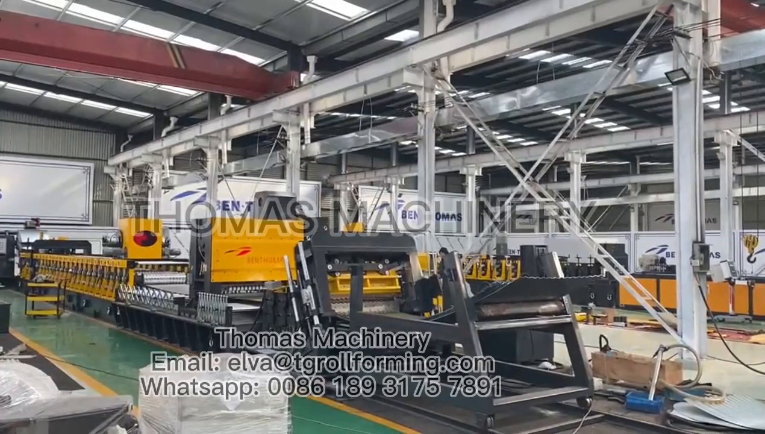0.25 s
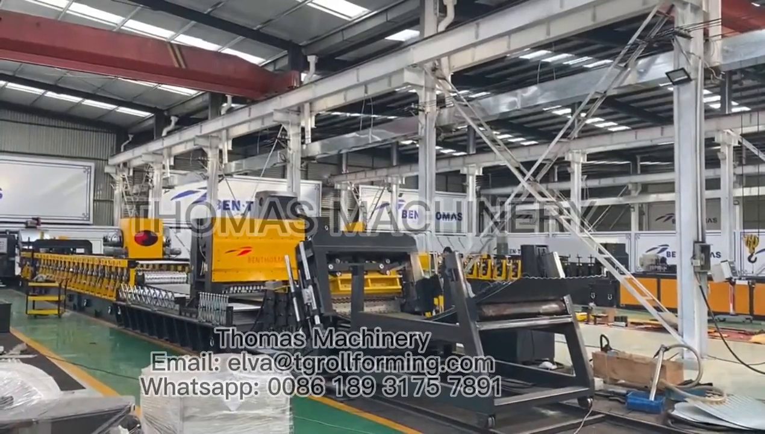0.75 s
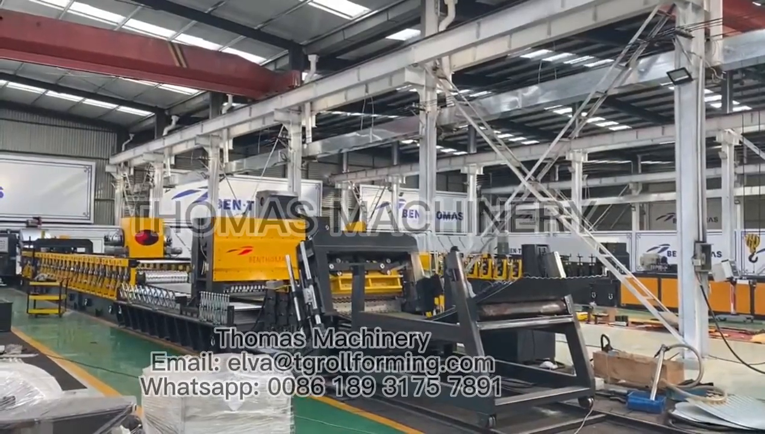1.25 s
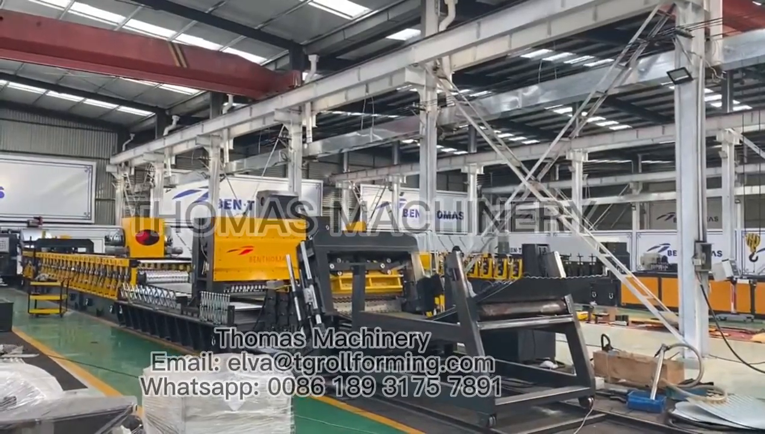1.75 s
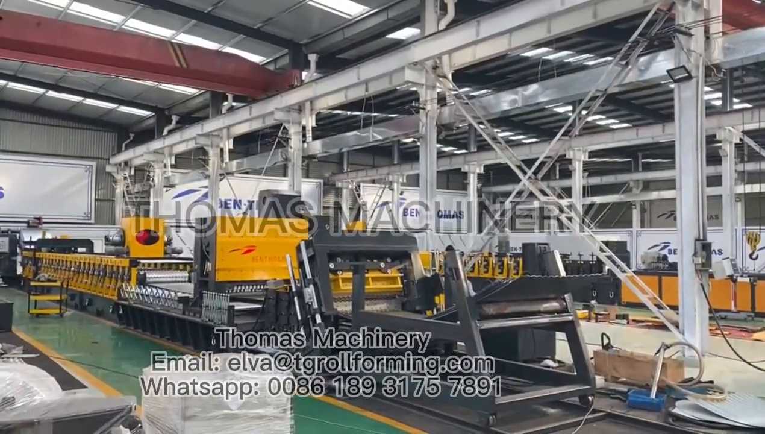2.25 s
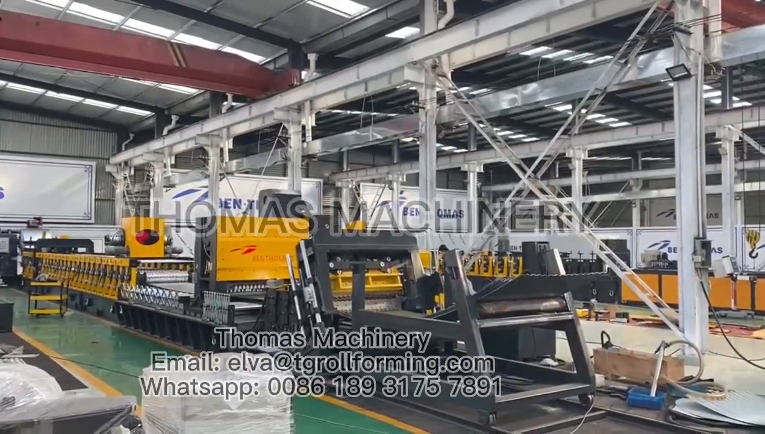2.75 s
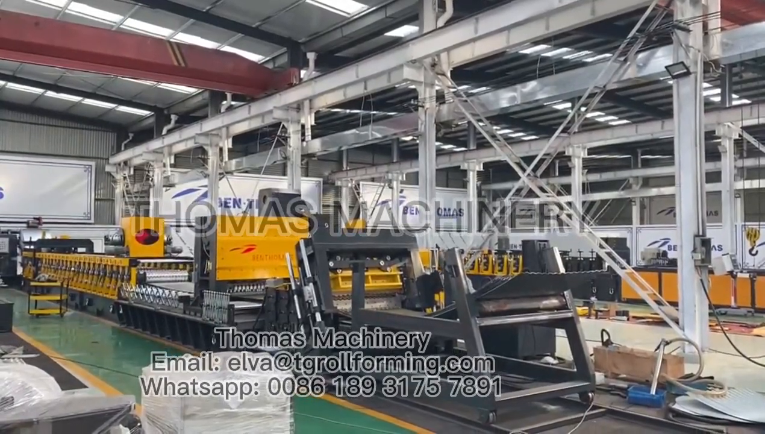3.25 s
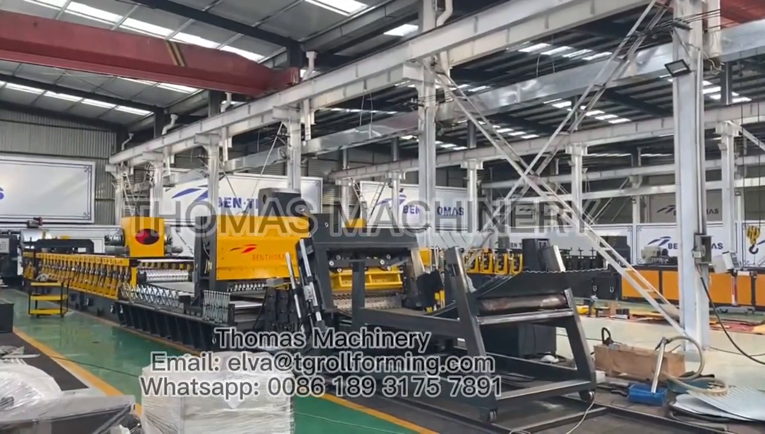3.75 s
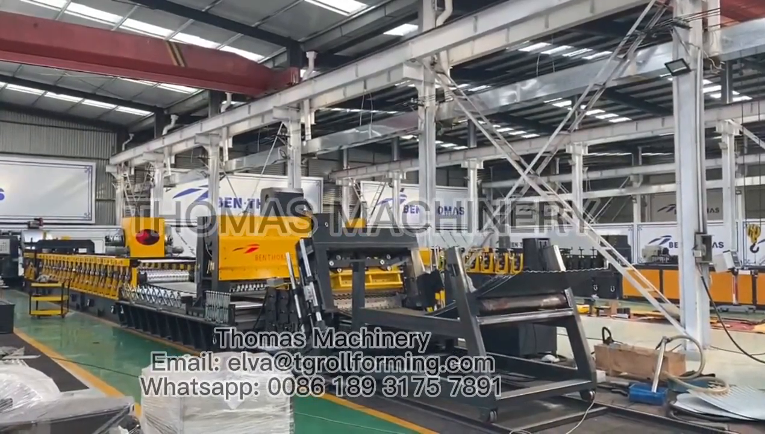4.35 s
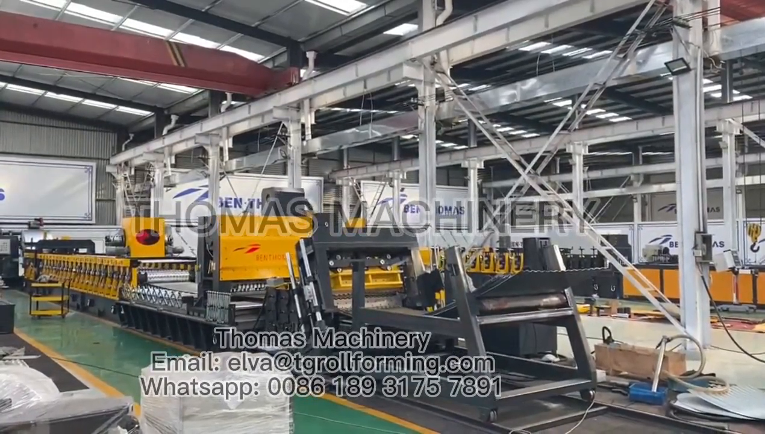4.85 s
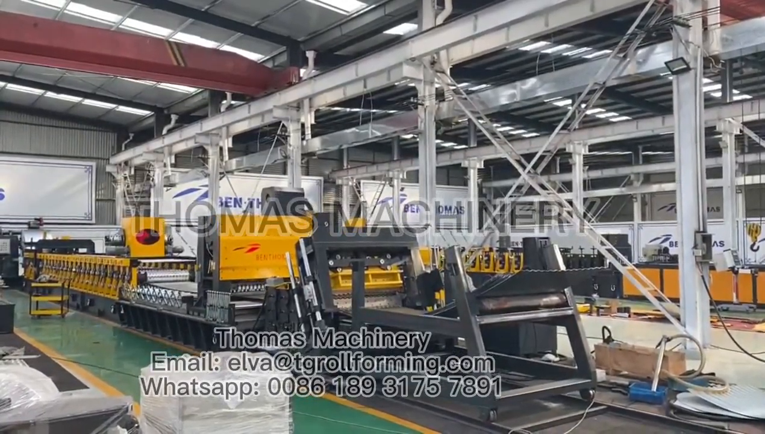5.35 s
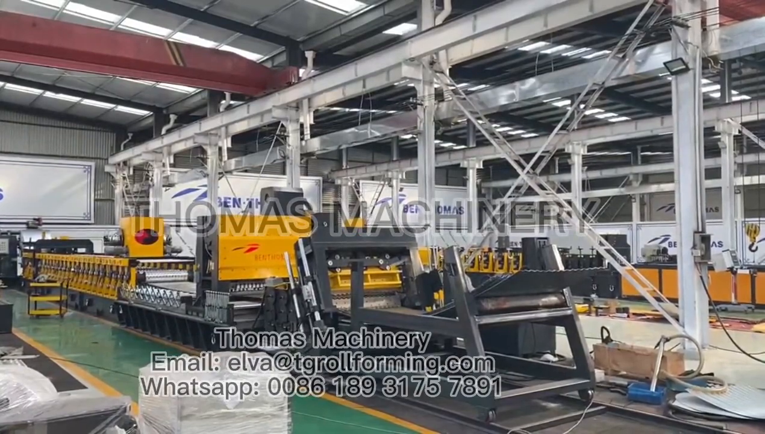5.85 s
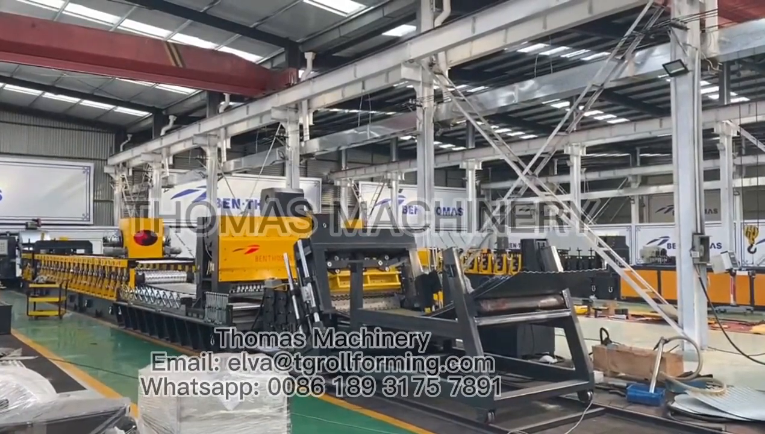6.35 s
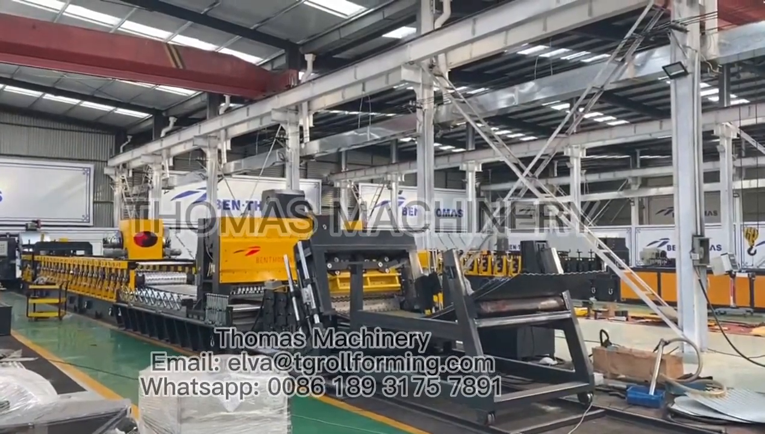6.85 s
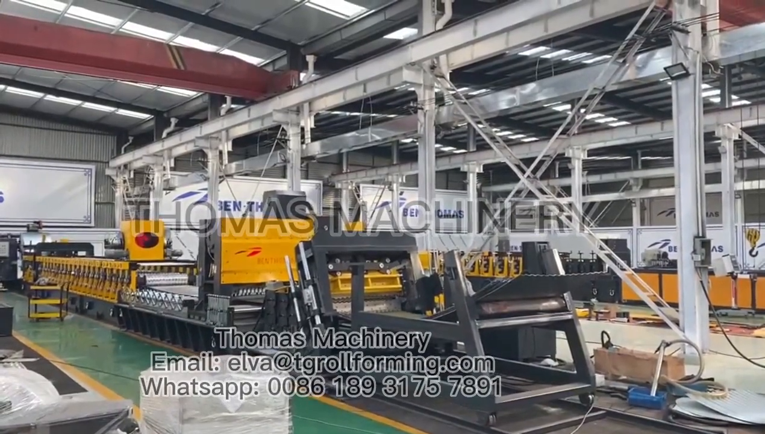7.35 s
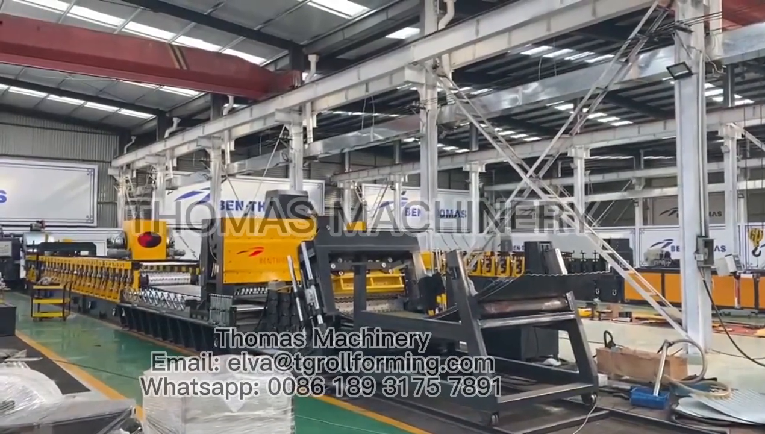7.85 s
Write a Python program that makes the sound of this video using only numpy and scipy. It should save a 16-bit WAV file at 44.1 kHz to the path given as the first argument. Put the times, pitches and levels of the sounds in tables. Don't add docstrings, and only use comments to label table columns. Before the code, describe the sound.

A sheet-metal machine works in a big reverberant hall. Over steady motor roar and low hum, a dull clamp knock comes first, then a sharp bright shear bang, then a landing clank and a swelling rush of booming, clattering sheet that fades within a second. This repeats about every two seconds, four times, with slight differences. It is heard in stereo from the side on a phone, with little deep bass.

```python
import sys
import numpy as np
from scipy import signal
from scipy.fft import rfft, irfft, next_fast_len
from scipy.io import wavfile
from scipy.ndimage import uniform_filter1d, map_coordinates

SR = 44100
rng = np.random.default_rng(int(sys.argv[2]) if len(sys.argv) > 2 else 0)


def invert_db(x):
    u = np.asarray(x, float) / 20
    return 10 ** u


def to_wav(s):
    ch = np.atleast_2d(s).T
    pcm = np.round(np.clip(ch, -1, 1) * 32767)
    wavfile.write(sys.argv[1], SR, pcm.astype(np.int16))


N = 356352


def unit(x):
    return x / np.sqrt(np.mean(x ** 2) + 1e-20)


def along(points, hz):
    f, v = np.transpose(points)
    return np.interp(np.log(hz + 1), np.log(f + 1), v)


def wobble(rate):
    knots = rng.standard_normal(int(N * rate / SR) + 4)
    return map_coordinates(knots, [np.arange(N) * rate / SR])


def filtered(x, response):
    m = next_fast_len(x.shape[-1] + SR // 2)
    hz = np.fft.rfftfreq(m, 1 / SR)
    return irfft(rfft(x, m) * response(hz), m)[..., :x.shape[-1]]


def modes(table):
    def response(hz):
        total = 0
        for k, (center, width, db) in enumerate(table):
            damping = 1j * hz * width
            total = total + (-1) ** k * invert_db(db) * damping / (center ** 2 - hz ** 2 + damping)
        return total
    return response


def patchy(patchy_db, narrow, long):
    z = signal.stft(rng.standard_normal((2, N)), nperseg=1024)[2]
    field = uniform_filter1d(rng.standard_normal(z.shape[1:]), narrow, axis=0)
    field = uniform_filter1d(field, long, axis=1)
    return signal.istft(z * invert_db(patchy_db * unit(field)), nperseg=1024)[1][:, :N]


def coloured(pair, spectrum, peaks=()):
    def response(hz):
        return invert_db(along(spectrum, hz)) * np.sqrt(1 + np.abs(modes(peaks)(hz)) ** 2)
    return unit(filtered(pair, response))


def add_at(track, s, sound):
    start = round(s * SR)
    track[:, start:start + sound.shape[-1]] += sound


# (frequency [Hz], level per Hz [dB])
HALL_TONE = [(20, -66), (48, -3), (90, -6), (180, -8.5), (300, -9), (420, -10), (500, -12.5), (1100, -13.5),
             (2000, -26.5), (3000, -34.5), (5000, -30.5), (7000, -43.5), (11000, -49), (12800, -66),
             (15500, -101)]
# (frequency [Hz], width [Hz], level [dB])
GEARS = [(1730, 33, 7), (2910, 170, 13), (4210, 100, 9.5), (5140, 650, 4.5)]
# (multiple of the shaft speed [-], level [dB])
MOTOR = [(2, -14), (4, -6), (5, -12), (6, -10), (7, 2.5), (8, -2), (9, -12), (10, -13), (12, -5), (14, -12),
         (15, -3.5), (16, -8), (17, -12), (18, -11), (19, -17), (21, -10)]
# (time [s], level [dB])
PUMP = [(0.0, -42), (0.9, -38.5), (1.19, -58), (1.53, -36), (2.3, -52), (3.58, -39), (4.57, -51),
        (5.83, -37), (6.17, -54), (6.77, -43.5), (7.76, -41), (8.08, -45)]
# (frequency [Hz], level [dB])
WHINE_TONES = [(827, 3), (262.3, -7), (903, -2), (925, -5)]


def machines():
    shaft_hz = 24.94
    turns = np.cumsum(shaft_hz * (1 + 0.0013 * wobble(2.267))) / SR
    throb = 1 + 0.04 * np.sin(4 * np.pi * turns) + 0.089 * np.sin(8 * np.pi * turns)
    roar = invert_db(-31.5) * throb * coloured(patchy(2.4, narrow=2, long=12), HALL_TONE, GEARS)

    angle = np.linspace(0, 1, 1025)
    patterns = np.zeros((3, len(angle)))
    for multiple, db in MOTOR:
        patterns += invert_db(db) * np.sin(2 * np.pi * (multiple * angle + rng.random((3, 1))))
    hum = np.zeros(N)
    for db, pattern in zip((-30.5, -45, -45), patterns):
        hum += invert_db(db + 0.8 * wobble(2.5)) * np.interp(turns % 1, angle, unit(pattern))

    seconds = np.arange(N) / SR
    uneven_time = seconds + 0.0013 * np.cumsum(wobble(13)) / SR
    whine = np.zeros(N)
    for hz, db in WHINE_TONES:
        whine += invert_db(db + 1.6 * wobble(14)) * np.sin(2 * np.pi * hz * uneven_time)
    pump_db = np.interp(seconds, *np.transpose(PUMP))
    return roar + (hum + invert_db(pump_db) * whine) * np.array([[1], [0.6]])


# (frequency [Hz], time to fall 60 dB [s])
ECHO = [(100, 2.6), (1000, 6.6), (4000, 0.74), (12000, 0.48)]


def echo(pair):
    hz, t, z = signal.stft(rng.standard_normal((2, 3 * SR // 2)), SR, nperseg=256)
    fade = invert_db(-60 * t / along(ECHO, hz)[:, None])
    tail = signal.istft(z * fade, SR, nperseg=256)[1]
    late = np.pad(pair, ((0, 0), (1300, 0)))
    return signal.fftconvolve(late, tail / np.linalg.norm(tail[0]), axes=1)[:, :N]


# (time [s], peak level [dB], frequency [Hz], time to fall 60 dB [s])
KNOCKS = [(.725, -22.5, 397, 0.21), (.885, -26, 900, .2), (.975, -21.5, 2400, 0.16), (.985, -26, 3150, .1),
          (.98, -26, 1950, .25), (2.864, -25, 390, 0.34), (3.042, -18, 900, 0.12), (3.044, -24, 1500, .1),
          (3.12, -22, 2300, .2), (3.11, -22, 6600, .07), (3.05, -26, 2000, .2), (5.02, -25, 1120, 0.16),
          (5.165, -28, 906, 0.33), (5.27, -21.5, 2110, 0.28), (5.285, -26, 4070, .2),
          (5.555, -17, 916, 0.2), (5.56, -22, 1900, .25), (6.954, -26.5, 404, 0.18),
          (6.965, -27, 1100, 0.15), (7.12, -23, 493, 0.2), (7.122, -27, 900, .15), (7.17, -24, 520, .15),
          (7.04, -26, 280, .12), (7.125, -33, 1200, .2), (7.35, -29, 2200, .15), (7.515, -24, 2050, .2),
          (7.51, -27, 3100, .15)]


def knocks():
    t = np.arange(SR // 3) / SR
    track = np.zeros((2, N + SR))
    for s, db, hz, t60 in KNOCKS:
        pitch = hz * (1 + 0.07 * rng.standard_normal((5, 1, 1)))
        phase = rng.random((5, 2, 1))
        ring = np.sin(2 * np.pi * (pitch * t + phase)).sum(axis=0)
        add_at(track, s, (1 - np.exp(-t / 0.0041)) * invert_db(db - 3 - 60 * t / t60) * ring)
    return track[:, :N]


# (time [s], peak level [dB])
TICKS = [(0.7267, -33), (0.925, -32), (0.944, -24), (.98, -21), (1.04, -26), (1.256, -21), (2.6194, -48),
         (2.8569, -37), (3.06, -36), (3.085, -25), (3.3912, -26), (5.0115, -35), (5.196, -36), (5.23, -22),
         (5.534, -26), (5.544, -18), (5.8685, -45), (6.9454, -34), (7.165, -34), (7.187, -17), (7.208, -14),
         (7.4984, -22), (7.5794, -29), (7.75, -36), (7.9, -35), (3.44, -27), (3.6, -32)]
# (frequency [Hz], level per Hz [dB])
EDGE = [(4000, -40), (7000, -9), (11000, 1), (15500, -1), (15800, -60)]


def ticks():
    t = np.arange(SR // 3) / SR
    track = np.zeros((2, N + SR))
    for s, db in TICKS:
        shape = (1 - np.exp(-t / 0.004)) ** 2 * invert_db(db + 3.5 - 60 * t / 0.14)
        add_at(track, s, shape * rng.standard_normal((2, len(t))))
    return filtered(track, lambda hz: invert_db(along(EDGE, hz)))[:, :N]


# (time [s], peak level [dB], thud level [dB], clang level [dB], thud frequency [Hz])
BLOWS = [(0.72, -27, 8, -11, 88.8), (0.889, -25, 5, -14, 141), (0.942, -4, -14, -11, 122.7),
         (1.256, -15, -3, -3, 76.8), (2.619, -31, -0.5, -6, 182), (2.8594, -29, 5, -1, 100),
         (3.0437, -21, 8, 0, 124), (3.085, -5, -15, -17, 96), (3.1121, -9, -8, -6, 138.3),
         (3.3998, -16, 0, 4, 77.5), (4.436, -39, 18, 12, 181), (5.0206, -29, -5, -7, 292),
         (5.1685, -26, 8, -7, 300), (5.231, -6, -9, -5, 213), (5.544, -14, -4, 0.5, 88.3),
         (5.8684, -30.5, 8, 13, 138.2), (6.944, -28, 4, -9, 118), (7.1223, -26, -6, -7, 185),
         (7.184, -10, -8, -22, 121), (7.208, -12, -4, -16, 140.6), (7.4983, -15.5, -3, 1, 136),
         (7.5794, -34, -10, 3, 280)]
# (frequency [Hz], level per Hz [dB])
SNAP = [(1200, -20), (1800, -1.5), (2400, -15), (3200, -29), (4500, -3.5), (6200, -0.5), (8000, -2),
        (10000, -1.5), (12000, -10), (15400, -12), (15800, -60)]
# (frequency [Hz], width [Hz], level [dB])
BLADE = [(2300, 580, 11.5), (4020, 150, 12), (4470, 230, -1), (6100, 300, -4), (6900, 630, -1.5),
         (8500, 220, 5.5), (9650, 60, 6.5), (10000, 52, -1)]
# (frequency [Hz], width [Hz], level [dB])
PANEL = [(510, 88, 1), (858, 23, 11), (1269, 25, 10), (1900, 310, -5), (2380, 110, 4)]


def blows():
    t = np.arange(SR // 3) / SR
    shape = (1 - np.exp(-t / 0.0042)) ** 2 * invert_db(-60 * t / 0.37)
    on_blade, on_panel, thuds = np.zeros((3, 2, N + SR))
    for s, db, thud_db, clang_db, hz in BLOWS:
        thud = np.sin(2 * np.pi * hz * t) * (1 - np.exp(-t / 0.022))
        add_at(on_blade, s, invert_db(db - 8.5) * shape * rng.standard_normal((2, len(t))))
        add_at(on_panel, s, invert_db(db + clang_db + 1.5) * shape * rng.standard_normal((2, len(t))))
        add_at(thuds, s, invert_db(db + thud_db - 3.5) * shape * thud)
    snap = filtered(on_blade, lambda hz: invert_db(along(SNAP, hz)) * (1 + np.abs(modes(BLADE)(hz))))
    clang = filtered(on_panel, modes(PANEL))
    return (snap + clang + thuds)[:, :N]


# (time of the crest [s], peak level [dB], frequency [Hz], length [s])
FLEXES = [(.97, -15, 118, .07), (1.03, -21, 255, .07), (1.27, -18, 80, .06), (1.31, -18, 107, .05),
          (1.37, -13, 263, .08), (1.4, -19, 199, .05), (1.44, -19, 339, .05), (1.444, -22, 1248, .03),
          (1.489, -20, 1475, .03), (1.52, -18, 177, .08), (1.52, -19, 279, .05), (1.63, -19, 177, .07),
          (3.11, -19, 75, .07), (3.13, -15, 134, .06), (3.35, -20, 140, .05), (3.44, -16, 204, .06),
          (3.5, -16, 253, .06), (3.534, -20, 1184, .03), (3.62, -17, 306, .06), (3.707, -20, 1270, .03),
          (5.22, -21, 100, .06), (5.276, -23, 1830, .04), (5.55, -18, 80, .05), (5.577, -20, 1819, .03),
          (5.6, -17, 215, .06), (5.61, -21, 530, .06), (5.71, -20, 300, .05), (5.85, -20, 255, .05),
          (6.07, -18, 215, .06), (7.215, -12, 120, .04), (7.24, -15, 95, .035), (7.225, -19, 240, .04),
          (7.235, -21, 370, .05), (7.29, -12.5, 134, .05), (7.29, -20, 250, .04), (7.36, -19, 230, .04),
          (7.4, -21, 110, .08), (7.45, -20, 145, .05), (7.5, -20, 120, .05), (7.533, -23, 2487, .04),
          (7.54, -22, 1313, .03), (7.543, -16, 807, .03), (7.135, -22, 480, .03), (7.185, -20, 520, .04),
          (7.2, -22, 180, .04), (3.047, -19, 900, .012), (7.56, -18, 253, .05), (7.71, -20, 250, .05),
          (7.77, -20, 180, .05), (7.807, -22, 1313, .03), (7.85, -20, 300, .05)]


def flexes():
    t = np.arange(-SR // 4, SR // 4) / SR
    track = np.zeros((2, N + SR))
    for s, db, hz, length_s in FLEXES:
        slower = np.where(t > 0, 1.25, 1)
        swell = np.exp(-(t / (0.45 * length_s * slower)) ** 2)
        add_at(track[:1], s - 0.25, invert_db(db) * swell * np.sin(2 * np.pi * hz * t))
    return track[:, :N]


def shaken(events, kind, rise_s, t):
    level_db, share, sag, fall = np.transpose(kind)[:, :, None]
    power = np.zeros((len(kind), len(t)))
    for s, db, weight_db, hold_s in events:
        age = t - s - rise_s
        still_to_rise_db = 12 * np.maximum(-age, 0) / rise_s
        sagged_db = sag * np.clip(age, 0, hold_s)
        fallen_db = fall * np.maximum(age - hold_s, 0)
        lost_db = still_to_rise_db + sagged_db + fallen_db
        power += (t > s) * invert_db(db + level_db + share * weight_db - lost_db) ** 2
    return power


# (time [s], load [dB])
FEED = [(0, 2), (.5, -4), (.85, 4), (2.4, 0), (2.7, 3), (3.0, 3), (4.2, 0), (4.55, -1), (4.7, 5.5),
        (5.1, 2), (6.5, -2), (6.75, -7), (7.1, 2), (8.08, 3.5)]
# (level [dB], change per dB of load [dB])
ROLLING = [
    (-36.5, .3),
    (-34, 0.5),
    (-44, 2.3),
    (-45.5, 0.9),
]
# (time [s], strength [dB], weight [dB], hold [s]); the first table
# holds the clamps plus stacker bumps at 2.0, 4.3 and 6.02 s, which shake like clamps
CLAMPS_AND_BUMPS = [(.70, -30, 1.5, .02), (2.0, -30.5, -4.5, 0.061), (2.84, -31.5, -2, 0.046),
                    (4.3, -39.5, -4, 0.044), (6.02, -28, 2, .05), (4.985, -30.5, -2, 0.018),
                    (6.935, -31.5, -5, 0.034)]
PRESSES = [(.87, -22, -1, 0.027), (3.012, -22, -1.1, 0.04), (5.145, -22, -2, .05), (7.09, -27, -1, 0.057)]
CUTS = [(.93, -23, 0, 0.073), (3.075, -22.5, -0.5, 0.097), (5.215, -21.5, 0, .11), (7.175, -26, 5, .1),
        (7.33, -27, 3, .12)]
LANDINGS = [(1.24, -21, 4.5, .05), (3.385, -20, 1.5, .04), (5.52, -12.5, -3.5, 0.014), (7.47, -22, -3, .02),
            (7.497, -12, -3, .04)]
SLIDES = [(-0.95, -18, 3, 0.55), (1.28, -15.5, 1.5, .25), (3.375, -15.5, -1.5, .27), (5.52, -16, -3, 0.3),
          (7.53, -21, -3, .08), (7.665, -19.5, -5, .16)]
# (level [dB], share of weight [-], sag in the hold [dB/s], fall after it [dB/s])
CLAMP = [(1.5, 0.79, 7, 140), (4, 0.17, 5, 81), (-2, -0.056, 5, 98), (-10.5, -0.55, 12, 60)]
PRESS = [(-0.5, 2.3, 5, 24), (-2, 0.37, 5, 48), (0, .05, 5, 48), (-14, .05, 5, 40)]
CUT = [(0.5, 0.91, 28, 48), (-5, 0.94, 15, 18), (-1.5, 0.053, 8.7, 20), (-2, 0.062, 32, 49)]
LANDING = [(-2, 1.2, 5, 100), (-4.5, 0.44, 5, 87), (-1.5, 0.041, 5, 72), (-8.5, 0.51, 5, 85)]
SLIDE = [(-9, 1.0, 14, 43), (-3.5, 0.99, 6.9, 38), (-1, .05, 6.4, 33), (-10.5, -.2, 15, 64)]
# (level [dB], share of weight [-], sag in the hold [dB/s], fall after it [dB/s])
LINGER = [(-12.5, .3, 3, 13), (-9, -.3, 2, 10.4), (-5, .05, 2.7, 16.6), (-21.5, 0.25, 3, 34)]


def shaking():
    t = np.arange(0, N, 32) / SR
    base_db, per_db = np.transpose(ROLLING)[:, :, None]
    load_db = np.interp(t, *np.transpose(FEED))
    power = invert_db(base_db + per_db * load_db) ** 2
    power += shaken(CLAMPS_AND_BUMPS, CLAMP, rise_s=0.033, t=t)
    power += shaken(PRESSES, PRESS, rise_s=0.04, t=t)
    power += shaken(CUTS, CUT, rise_s=0.043, t=t)
    power += shaken(LANDINGS, LANDING, rise_s=0.03, t=t)
    power += shaken(SLIDES, SLIDE, rise_s=0.093, t=t)
    power += shaken(SLIDES, LINGER, rise_s=0.093, t=t)
    gains = []
    for flap_db, layer in zip((1.6, 0.5, 0.7, 0.6), power):
        steady = np.interp(np.arange(N) / SR, t, np.sqrt(layer))
        gains.append(invert_db(flap_db * wobble(16)) * steady)
    return gains


def rattle(per_s, spread_db, life_s):
    hits = (rng.random(N) < per_s / SR) * invert_db(spread_db * rng.exponential(size=N))
    fall = np.exp(-1 / (life_s * SR))
    return unit(np.sqrt(2.4 + signal.lfilter([1], [1, -fall], hits)))


# (frequency [Hz], level per Hz [dB])
THUMP = [(25, -32), (45, -8.5), (70, 1.5), (100, -1), (130, -1), (160, -14.5), (220, -44)]
# (frequency [Hz], level per Hz [dB])
BOOM = [(100, -30), (150, -1.5), (200, 1), (270, 0.5), (380, -2), (520, -4), (800, -12), (1200, -71)]
# (frequency [Hz], width [Hz], level [dB])
DRUM = [(172, 8.8, -3), (219.5, 26, 2), (265.7, 5.8, 7.5), (293, 6.3, 4.5), (355.6, 14, 0)]
# (frequency [Hz], level per Hz [dB])
CLATTER = [(180, -20), (300, -3.5), (371, -8.5), (522, -6.5), (668, -7), (897, -5), (2040, -10),
           (2710, -18.5), (5000, -30), (6500, -37.5), (11000, -120)]
# (frequency [Hz], width [Hz], level [dB])
PLATE = [(527, 43, -2.5), (900, 33, -10), (1211, 49, 2), (1570, 90, -2), (1960, 53, -6.5), (2370, 32, -3)]
# (frequency [Hz], level per Hz [dB])
RASP = [(1500, -16.5), (2500, -3), (4000, -8), (6000, -11.5), (9000, -15.5), (11000, -16), (13000, -42),
        (15800, -56)]


def sheet():
    thump_gain, boom_gain, clatter_gain, rasp_gain = shaking()
    drum = patchy(1.3, narrow=2, long=5)
    thump = thump_gain * coloured(drum, THUMP)
    boom = boom_gain * coloured(drum, BOOM, DRUM)
    plate = coloured(patchy(1.6, narrow=2, long=4), CLATTER, PLATE)
    clatter = clatter_gain * rattle(370, 0.67, 0.011) * plate
    edges = coloured(patchy(3.7, narrow=3, long=3), RASP)
    rasp = rasp_gain * rattle(300, 2.4, 0.012) * edges
    return thump + boom + clatter + rasp


# (frequency [Hz], likeness, cut to -1..1 [-])
ALIKE = [(60, .995), (290, 0.97), (640, 0.27), (1410, 0.37), (3100, 0.93), (4300, .5), (5400, 0.25),
         (6400, 1.13), (8550, -1.1), (10200, 1.87), (12000, -2.57), (14000, 2.3), (15700, -2)]
# (frequency [Hz], lead [radians])
LEAD = [(60, 0.12), (690, 0.46), (1810, 0.35), (2930, 1), (6800, 0.45)]
# (frequency [Hz], left minus right [dB])
SIDEWAYS = [(60, -0.2), (110, -1.8), (200, -3), (380, -2), (700, 1.5), (1290, 3), (2380, 3.0), (4400, 2.5),
            (8120, -0.5), (15000, -0.5)]


def ports(pair):
    def mix(hz):
        turn = np.arccos(np.clip(along(ALIKE, hz), -1, 1)) / 2
        return np.array([np.cos(turn), np.sin(turn)])

    def tilt(hz):
        left = invert_db(along(SIDEWAYS, hz) / 2) * np.exp(0.5j * along(LEAD, hz))
        return np.array([left, 1 / left])

    mid, side = filtered(pair, mix)
    return filtered(np.array([mid + side, mid - side]), tilt)


def scene():
    steel = knocks() + ticks() + blows()
    return ports(machines() + invert_db(-9) * echo(steel) + steel + flexes() + invert_db(-1) * sheet())


def roll_off(x):
    return signal.sosfilt(signal.butter(12, 15780, fs=SR, output="sos"), x)


def record(dry):
    x = filtered(dry, lambda hz: (1j * hz / (48 + 1j * hz)) ** 2)
    x = x / (1 + np.abs(x / 0.95) ** 6) ** (1 / 6)
    return roll_off(x)


dry = scene()
out = record(dry)
to_wav(out)
```